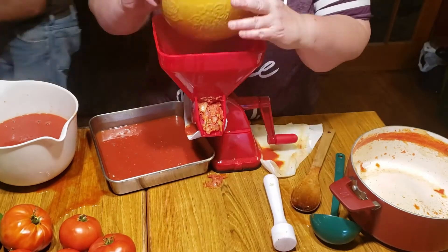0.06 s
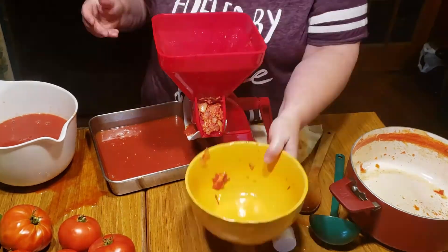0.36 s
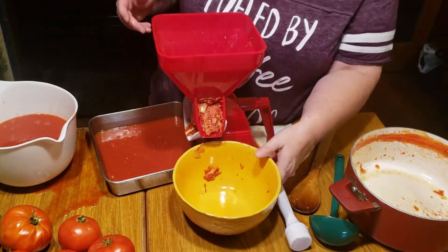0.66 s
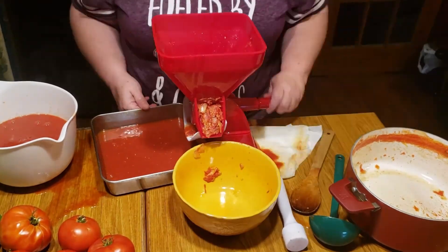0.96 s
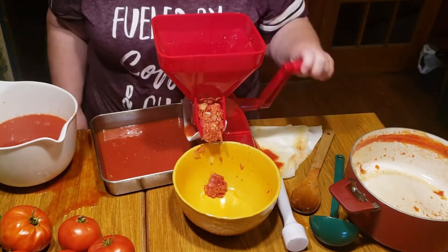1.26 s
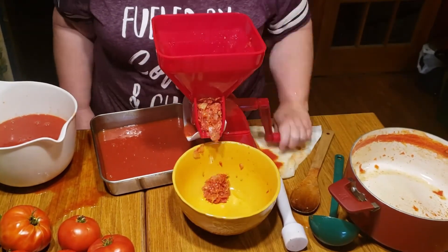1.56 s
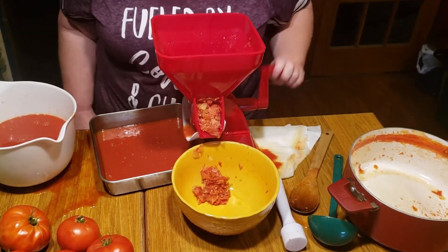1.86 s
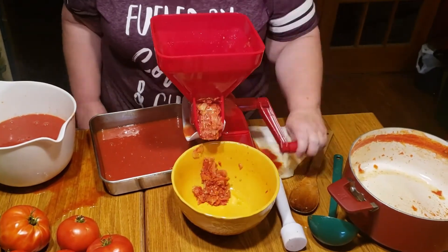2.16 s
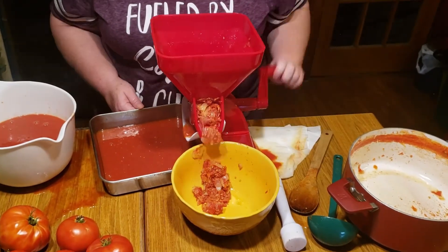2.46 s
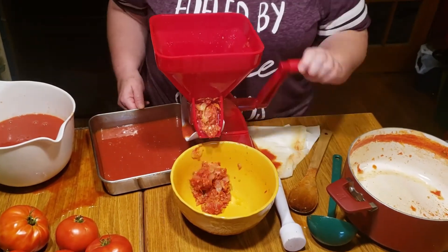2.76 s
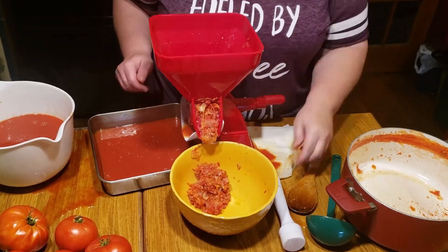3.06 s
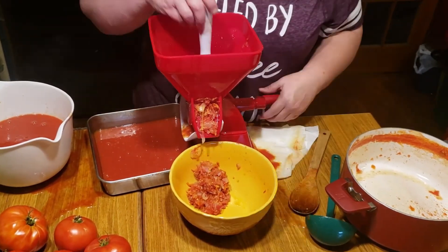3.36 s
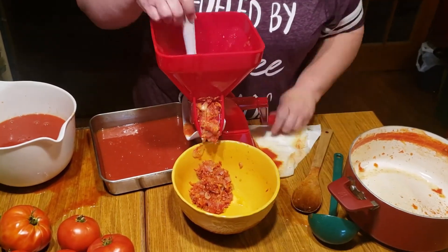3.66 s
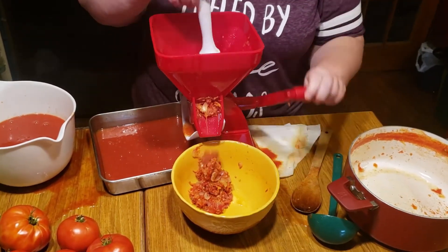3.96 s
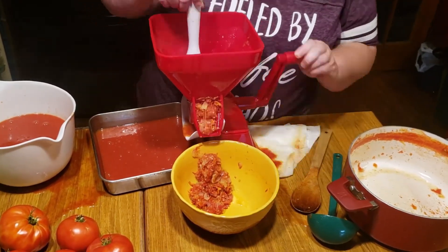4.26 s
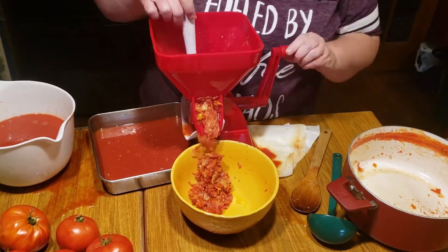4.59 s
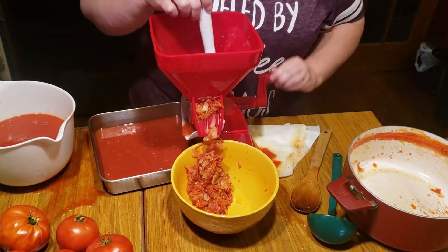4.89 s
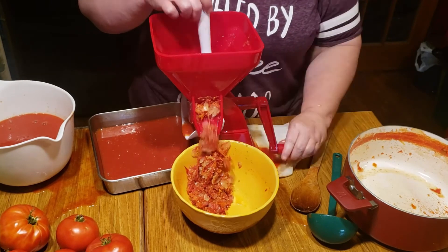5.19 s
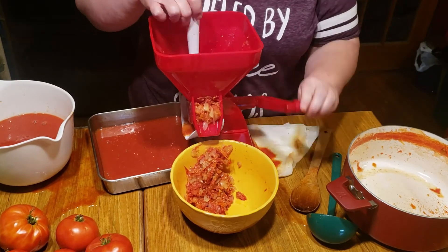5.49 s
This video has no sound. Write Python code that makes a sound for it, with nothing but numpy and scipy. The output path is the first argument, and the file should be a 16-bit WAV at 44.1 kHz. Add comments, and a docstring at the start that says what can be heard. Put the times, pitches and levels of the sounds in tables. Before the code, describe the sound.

Close by in a kitchen, a plastic tomato strainer is cranked by hand, snapping about eleven times a second over a soft wet crackle of pulp. Before it starts, a bowl squeaks and knocks down onto the table. Midway the clicking stops for a moment, with a small smack and short plastic squeaks, then continues a little slower while a pusher taps brightly in the hopper. A fan hums quietly throughout.

```python
"""A plastic tomato strainer is cranked on a kitchen table while a fan runs in the room.
First a bowl squeaks against the hopper and is set down with a few knocks.
From 0.9 s the screw snaps round about eleven times a second, squeezing wet pulp through the screen.
At 3.1 s it pauses and the plastic sticks and slips in short squeaks.
From 3.5 s the cranking resumes, a little slower, and a pusher rattles in the hopper."""
import sys
import numpy as np
from scipy import signal
from scipy.fft import rfft, irfft
from scipy.io import wavfile
from scipy.ndimage import uniform_filter1d

SR = 44100
rng = np.random.default_rng(int(sys.argv[2]) if len(sys.argv) > 2 else 0)


def waveform_to_disk(signal):
    """Save audio, clipped to [-1, 1], as 16-bit WAV at the path in sys.argv[1]."""
    frames = np.transpose(np.atleast_2d(signal))
    scaled = np.clip(frames, -1, 1) * 32767
    samples = np.round(scaled).astype(np.int16)
    wavfile.write(sys.argv[1], SR, samples)


N = 252825

# Screw snaps, accented against the usual one: (time [s], force [dB], sharpness [dB])
SCREW_SNAPS = [(0.886, 3, 5.5), (0.9939, 4.5, 6.5), (1.0993, -2.5, -3), (1.2078, 2.5, 3.5),
               (1.2898, -1.5, -0.5), (1.3783, 0.5, -0.5), (1.4717, 0, -2.5), (1.5712, 0.5, -2),
               (1.6701, 4, -6.5), (1.7539, 2, 1.5), (1.8438, 2, -4), (1.928, 1, -4.5), (2.0217, 1.5, -3),
               (2.1168, -5, 4), (2.2373, -4.5, 3), (2.3358, -2.5, 5.5), (2.44, -3, 0), (2.5303, 0, 2.5),
               (2.6229, -7, 7), (2.7048, 1, 3.5), (2.7954, -7, 5.5), (2.8805, 2, 0.5), (2.9641, -2.5, 6.5),
               (3.0593, 0, 4), (3.5689, 2, -6), (3.684, 1, 4.5), (3.7926, 2.5, 0), (3.9013, 6, -7),
               (4.0182, -2, 2), (4.1248, 1, -1.5), (4.2463, -3, 6.5), (4.4303, 3, -2.5), (4.5768, -3, 0.5),
               (4.7379, 2.5, 2), (4.8554, 0, 1), (4.9681, 1.5, -3), (5.0814, 3, -3), (5.1993, 3.5, -2),
               (5.306, -5, 2), (5.4309, -0.5, 3.5), (5.5555, 3.5, -9.5), (5.684, -0.5, 1)]
# EQ of the snap's attack: (frequency [Hz], level [dB])
SCREW_EQ = [(50, -15), (165, -25), (280, 17.5), (500, 11.5), (800, 21), (1100, 13.5), (1350, 21.5),
            (1600, 2), (1950, 21.5), (2800, 4.5), (3350, 14.5), (4150, 12), (5200, 5), (11500, 0),
            (16000, -0.5)]
# Ring of the housing: (frequency [Hz], level [dB], 60 dB decay [s])
HOUSING_MODES = [(276.6, -10, 0.15), (536, -47, 0.25), (780, -1.5, 0.14), (1973, 5.5, 0.069),
                 (3000, -28, 0.062), (3390, -17, 0.082), (3490, -17.5, 0.16), (4100, -0.5, 0.013),
                 (3930, -9.5, 0.097), (4510, -3.5, 0.026)]


def screw(pusher_in_s=3.3, steadied_db=-5, rocking_hz=400):
    """The screw snaps round and rings the housing: the lead rhythm."""
    out = np.zeros((2, N))
    hits = contacts(SCREW_SNAPS, body_db=-37, force_share=0.32, sharp_share=0.16,
                    ring_db=-33, snap_db=-37, bright_hz=3650, spread_octaves=0.089)
    hits[0, -1] = 8560  # Hz: a high ping as the crank takes up its slack
    for hit in hits:
        # once the pusher bears down, the strainer rocks less: its low thump weakens
        low_cut_db = steadied_db * (hit[0] > pusher_in_s)
        eq = [(hz, db + low_cut_db * (hz < rocking_hz)) for hz, db in SCREW_EQ]
        add(out, *blow(hit, eq, HOUSING_MODES, scatter_db=0.5, modes_db=-21.5,
                       bright_db=5.5, bright_octaves=0.36, slip_db=-37, bend_s=0.000337))
    return out


# Pusher taps, accented against the usual one: (time [s], force [dB], sharpness [dB])
PUSHER_HITS = [(3.608, -8, 0), (3.7356, 2.5, -1), (3.8133, -2.5, -8), (3.8201, -4.5, -1),
               (3.8968, 2.5, 4.5), (3.9931, 5, 0), (4.2329, 3, 1), (4.2991, 2, 1), (4.3817, -0.5, -1.5),
               (4.4487, -9, -2), (4.4872, 3.5, 4), (4.5536, 0.5, 2), (4.6151, 9, -10.5), (4.6756, -5, -1.5),
               (4.8142, 2, 2.5), (4.9054, 4.5, 0), (4.9887, 3, -1), (5.0703, 5, -4.5), (5.1336, 0.5, -3.5),
               (5.1934, -7, -5), (5.2914, 2.5, 3), (5.3668, -2.5, 1.5), (5.5849, 3.5, -0.5),
               (5.6568, 5, 0.5), (5.728, -5.5, -5)]
# EQ of the tap's attack: (frequency [Hz], level [dB])
PUSHER_EQ = [(150, -52), (700, -1), (1600, 2), (2200, 10.5), (2570, 17.5), (2950, 12), (3450, 15.5),
             (4150, 18.5), (5200, 7.5), (7000, 4.5), (15000, -12)]
# Ring of the hopper: (frequency [Hz], level [dB], 60 dB decay [s])
HOPPER_MODES = [(2546, 1.5, 0.055), (3230, -9.5, 0.098), (3570, -35.5, 0.088), (3620, 3, 0.028),
                (3600, -41, 0.16), (4270, 2.5, 0.025), (4630, -23, 0.041)]


def pusher():
    """The pusher taps the hopper wall: a thin, bright rattle."""
    out = np.zeros((2, N))
    for hit in contacts(PUSHER_HITS, body_db=-51.5, force_share=0.56, sharp_share=0.49,
                        ring_db=-33, snap_db=-43, bright_hz=3330, spread_octaves=0.1):
        add(out, *blow(hit, PUSHER_EQ, HOPPER_MODES, scatter_db=0.5, modes_db=-19.5,
                       bright_db=4.5, bright_octaves=0.24, slip_db=-50, bend_s=0.000193))
    return out


# Bowl knocks, accented against the usual one: (time [s], force [dB], sharpness [dB])
BOWL_HITS = [(0.086, -4.5, 10), (0.5061, 4.5, -3.5), (0.516, -2.5, -9), (0.5477, 1.5, 2.5)]
# EQ of the knock's attack: (frequency [Hz], level [dB])
BOWL_EQ = [(150, -27), (330, -7), (470, 4.5), (680, -2.5), (1100, 1), (1700, 6), (2150, 8.5), (2700, 0),
           (3500, 5), (6000, 0), (16000, -15)]
# Ring of the bowl: (frequency [Hz], level [dB], 60 dB decay [s])
BOWL_MODES = [(946, -20, 0.092), (1090, -21, 0.11), (1477, -8.5, 0.061), (2090, -12.5, 0.18)]


def bowl():
    """The bowl meets hopper and table: knocks with a full midrange."""
    out = np.zeros((2, N))
    for hit in contacts(BOWL_HITS, body_db=-30.5, force_share=1.0, sharp_share=-0.1,
                        ring_db=-36.5, snap_db=-42.5, bright_hz=990, spread_octaves=0.066):
        add(out, *blow(hit, BOWL_EQ, BOWL_MODES, scatter_db=2, modes_db=-27,
                       bright_db=11.5, bright_octaves=0.62, slip_db=-53, bend_s=0.000096))
    return out


def contacts(events, body_db, force_share, sharp_share, ring_db, snap_db, bright_hz, spread_octaves):
    """Voices accents as hits: (time [s], body [dB], ring [dB], snap [dB], bright peak [Hz])."""
    s, force_db, sharp_db = np.transpose(events)
    # each contact lands on a slightly different spot
    peak_hz = bright_hz * 2 ** (spread_octaves * rng.standard_normal(len(s)))
    body = body_db + force_share * force_db + sharp_share * sharp_db
    return np.transpose([s, body, ring_db + force_db, snap_db + force_db + sharp_db, peak_hz])


# Crossovers of a hit's three registers: (body to ring [Hz], ring to snap [Hz])
CROSSOVERS = [2250, 5700]
# Early reflections off the table and pots: (frequency [Hz], 60 dB decay [s])
TABLE_DECAY = [(200, 0.24), (1000, 0.051), (3500, 0.052), (8000, 0.052), (16000, 0.068)]
TOP_HZ = 16150  # upper edge of the sound


def blow(hit, eq, modes, scatter_db, modes_db, bright_db, bright_octaves, slip_db, bend_s, size=8192):
    """One impact: faces slide, crack and set the part ringing. Returns start time and sound."""
    s, *levels_db, bright_hz = hit
    t, hz = np.arange(size) / SR, bins(size)
    lead = 160  # samples of sliding before the snap
    push = gain_of(scatter_db) * np.roll(tail(TABLE_DECAY, size), lead, axis=1)
    push[:, lead] += 1
    push[:, :lead] += gain_of(slip_db) * rng.standard_normal(lead) * np.linspace(0, 1, lead)
    sound = coloured(push, curve(eq, hz))
    age = np.maximum(t - lead / SR, 0)
    for (rest_hz, db, t60), (accent, load) in zip(modes, rng.standard_normal((len(modes), 2))):
        mode_hz = rest_hz * (1 + 0.011 * load)  # pulp and grip detune each hit
        envelope = gain_of(modes_db + db + 3.8 * accent - 60 * age / t60)
        sound += envelope * np.sin(2 * np.pi * mode_hz * age)
    lag_turns = bend_s * (2 * np.sqrt(hz * TOP_HZ) - hz)  # bending waves: the treble arrives first
    sound = irfft(rfft(sound) * np.exp(-2j * np.pi * lag_turns))
    tone_db = bright_db * np.exp(-(np.log2((hz + 1) / bright_hz) / bright_octaves) ** 2)
    tone_db += 1.7 * drift(len(hz), size=260)  # no two contacts have quite the same colour
    # ride body, ring and snap to their levels, with the energy taken over 20 ms
    register = np.searchsorted(CROSSOVERS, hz)
    energy = np.bincount(register, abs(rfft(sound.mean(0)) * gain_of(tone_db)) ** 2) * 2 / size
    trim_db = np.array(levels_db) - 10 * np.log10(energy / (0.02 * SR))
    return s - lead / SR, coloured(sound, tone_db + uniform_filter1d(trim_db[register], size=70))


# Squeak cues: (start [s], length [s], relative level [dB], top pitch [Hz], overtone boost [dB])
SQUEAK_CUES = [(-.015, .06, -39, 1162, 4), (0.049, .035, -38, 1282, 0.5), (3.353, 0.075, -35.5, 1174, 3.5),
               (3.44, 0.019, -45, 1030, 7), (3.468, 0.0076, -40, 1005, 0), (3.501, .027, -44, 1056, 5),
               (3.52, 0.015, -40.5, 1200, -3), (3.652, 0.014, -33.5, 1510, -16)]
# EQ across the harmonics: (frequency [Hz], level [dB])
SQUEAK_EQ = [(1000, 3.5), (2100, 1.5), (2600, -9), (3300, 3), (4400, -6.5), (6500, -10), (8000, -12),
             (10000, -11), (13000, -17), (16000, -24)]


def squeaks(jitter=0.025, flutter_db=3.5, sag_hz_per_s=2400, slack_db=-7, fade_s=0.004):
    """Plastic sticks and slips; pitch and level rise and fall with one swell of pressure."""
    out = np.zeros((2, N))
    for s, length, db, top_hz, overtones_db in SQUEAK_CUES:
        t = np.arange(max(-s, 0), length, 1 / SR)
        slack = 1 - np.exp(-((t / length - 0.4) / 0.19) ** 2)  # pressure peaks 40% of the way in
        hz = top_hz - sag_hz_per_s * length * slack
        turns = np.cumsum(hz * (1 + jitter * drift(len(t), size=40))) / SR
        slips = gain_of(curve(SQUEAK_EQ, hz)) * np.cos(2 * np.pi * turns)
        for k in range(2, 15):
            flicker_db = -drift(len(t), size=400)
            harmonic_db = curve(SQUEAK_EQ, k * hz) + overtones_db + flicker_db
            slips += gain_of(harmonic_db) * np.cos(2 * np.pi * k * turns)
        level_db = db + slack_db * slack + flutter_db * drift(len(t), size=90)
        fade = np.clip(np.minimum(t, length - t) / fade_s, 0, 1)
        add(out, s, unit_rms(slips) * gain_of(level_db) * fade)
    reflections = convolved(out, tail(TABLE_DECAY, size=4096))
    return gain_of(1) * (out + gain_of(-2) * reflections)


# Soft thuds of the table and of falling pulp: (time [s], level [dB], pitch [Hz], 60 dB decay [s])
THUD_CUES = [(0.086, -24, 324, 0.021), (0.185, -34.5, 307, 0.042), (0.888, -33, 292, 0.072),
             (0.996, -46, 65, 0.048), (2.532, -48, 70, .04)]


def thuds(attack_s=0.0013):
    """Short low pushes that hardly ring."""
    out, t = np.zeros((2, N)), np.arange(SR // 5) / SR
    attack = 1 - np.exp(-t / attack_s)
    for s, db, hz, t60 in THUD_CUES:
        add(out, s, gain_of(db - 60 * t / t60) * np.sin(2 * np.pi * hz * t) * attack)
    return out


# EQ of pulp squeezed through the screen: (frequency [Hz], level [dB])
PULP_EQ = [(300, -8), (1500, -9), (3300, 0), (4100, 2.5), (5200, -5), (8300, -5), (9500, -8), (16000, -10)]


def pulp(band_pops_per_s=30, spread_db=4, smear_db=-2, surge_db=2, width_octaves=0.27):
    """Skins and bubbles burst in tiny wet puffs in eight bands, over the smear of pulp on the screen."""
    pops, hz = np.zeros((2, N)), bins(2048)
    for centre_hz in np.geomspace(2500, 14000, num=8):
        strengths = gain_of(spread_db * np.minimum(rng.exponential(1, N), 5))
        bursts = strengths * (rng.random(N) < band_pops_per_s / SR)
        band_db = -10 * np.log10(1 + (np.log2((hz + 1) / centre_hz) / width_octaves) ** 4)
        puff = coloured(tail(TABLE_DECAY, size=2048), band_db)
        pops += convolved(bursts[None], puff)
    smear = gain_of(smear_db + surge_db * drift(N, size=900)) * stereo_noise(N)
    return unit_rms(equalised(unit_rms(pops) + smear, PULP_EQ)) * pulp_flow()


# Spells of cranking: (start [s], stop [s], opening pulp level [dB])
CRANK_SPELLS = [(0.806, 3.067, -53.5), (3.47, 5.73, -56)]
# Soft wet smacks and slops: (time [s], level [dB], rise [s])
SMACK_CUES = [(.467, -47, 0.009), (.51, -48.5, 0.048), (.692, -49, 0.0078), (3.196, -45.5, 0.0053)]


def pulp_flow(rise_s=0.033, fall_s=0.034, fill_db_per_s=0.85, seep_db=-77):
    """Pulp envelope: it seeps at rest, swells under the crank as the screen fills, and at times smacks."""
    t = np.arange(N) / SR
    flow = np.full(N, gain_of(seep_db))
    for start, stop, db in CRANK_SPELLS:
        turning = np.clip((t - start) / rise_s, 0, 1) * np.exp(-np.maximum(t - stop, 0) / fall_s)
        flow += turning * gain_of(db + fill_db_per_s * (t - start))
    for s, db, smack_rise_s in SMACK_CUES:
        age = np.maximum(t - s, 0) / smack_rise_s
        flow += gain_of(db) * age * np.exp(1 - age)
    return flow


# EQ of the fan's air: (frequency [Hz], level [dB])
FAN_EQ = [(40, -20), (160, -24.5), (265, -10), (335, -3.5), (570, 3.5), (670, -10), (770, -2), (960, -1),
          (1070, -14), (1250, -8.5), (1700, -14), (3450, -14), (4100, -21.5), (16000, -43.5)]
# The fan's hum: (pitch [Hz], level [dB])
FAN_HUM = [(349, -59)]


def fan(air_db=-48, swell_db=0.93, waver_hz=3.32, hum_swell_db=3.7):
    """The background bed: a steady rush of air with a faint wavering hum."""
    air = unit_rms(equalised(stereo_noise(N), FAN_EQ))
    hum = np.zeros(N)
    for hz, db in FAN_HUM:
        turns = np.cumsum(hz + waver_hz * drift(N, size=2500)) / SR
        hum += gain_of(db) * np.sqrt(2) * np.sin(2 * np.pi * turns)
    air *= gain_of(air_db + swell_db * drift(N, size=5000))
    return air + hum * gain_of(hum_swell_db * drift(N, size=4000))


# Kitchen reverb: (frequency [Hz], 60 dB decay [s])
KITCHEN_DECAY = [(3000, 1), (16000, 0.46)]


def kitchen(near):
    """The room answers a mono send with a stereo tail whose treble dies first."""
    return convolved(near.mean(0)[None], tail(KITCHEN_DECAY, size=16384))


def tail(decays, size):
    """Dense reflections of energy 1, each band dying at its own speed."""
    hz, t, spectra = signal.stft(stereo_noise(size), SR, nperseg=128)
    decay = gain_of(-60 * t / curve(decays, hz)[:, None])
    reflections = signal.istft(spectra * decay, SR, nperseg=128)[1][:, :size]
    fade_in = 1 - np.exp(-(np.arange(size) / SR / 0.0004) ** 2)
    return unit_rms(reflections * fade_in) / np.sqrt(size)


# Stereo image of reflected sound: (frequency [Hz], left-right likeness [0-1])
STEREO_IMAGE = [(150, 0), (300, 0.99), (1800, 0.91), (4200, 0.5), (8000, 0.01), (16000, 0.13)]


def stereo_noise(size):
    """White noise, centred in the mids and wide in the bass and treble."""
    a, b = rfft(rng.standard_normal((2, size)))
    likeness = np.clip(curve(STEREO_IMAGE, bins(size)), 0, 1)
    mid, side = a * np.sqrt((1 + likeness) / 2), b * np.sqrt((1 - likeness) / 2)
    return irfft([mid + side, mid - side], size)


def coloured(x, db):
    """Causal filter with the given gain in every bin, so that attacks stay sharp."""
    log_gain = np.log(gain_of(np.r_[db, db[-2:0:-1]]))
    response = np.exp(np.conj(signal.hilbert(log_gain)))[:len(db)]
    return irfft(rfft(x) * response)


def equalised(x, eq):
    """Zero-phase EQ on a whole track."""
    return irfft(rfft(x) * gain_of(curve(eq, bins(N))), N)


def convolved(x, response):
    """Plays a track through an impulse response."""
    return signal.oaconvolve(x, response, axes=1)[:, :N]


def drift(length, size):
    """Random wobble of rms 1, smoothed over size samples."""
    return unit_rms(uniform_filter1d(uniform_filter1d(rng.standard_normal(length), size), size))


def curve(points, hz):
    """Joins breakpoints on a log-frequency axis."""
    point_hz, value = np.transpose(points)
    return np.interp(np.log(hz + 1), np.log(point_hz), value)


def add(mix, s, sound):
    """Mixes a sound in at time s."""
    part = mix[:, max(round(s * SR), 0):][:, :sound.shape[-1]]
    part += sound[..., :part.shape[1]]


def bins(size):
    """Frequencies of a spectrum of this many samples."""
    return np.fft.rfftfreq(size, 1 / SR)


def gain_of(db):
    """Decibels to amplitude."""
    return 10 ** (np.asarray(db) / 20)


def unit_rms(x):
    """Scales to rms 1."""
    return x / np.sqrt(np.mean(x ** 2) + 1e-20)


def scene():
    """The mix: everything on the table up front, a touch of kitchen reverb, the fan behind."""
    low_cut = signal.butter(1, 140, "high", fs=SR, output="sos")  # small parts radiate little bass
    impacts = gain_of(-0.29) * signal.sosfilt(low_cut, screw() + pusher() + bowl())
    near = impacts + thuds() + squeaks() + pulp()
    return near + gain_of(-32) * kitchen(near) + fan()


def record(dry):
    """The master: the left channel a little brighter, then a steep high cut."""
    lean_db = curve([(500, -0.39), (2000, 0.55), (4000, 0.77), (12000, 1.3)], bins(N))
    tilted = irfft(rfft(dry) * gain_of([lean_db / 2, -lean_db / 2]), N)
    high_cut = signal.firwin(255, TOP_HZ, window=("kaiser", 9), fs=SR)
    return signal.oaconvolve(tilted, high_cut[None], "same")


dry = scene()
out = record(dry)
waveform_to_disk(out)
```